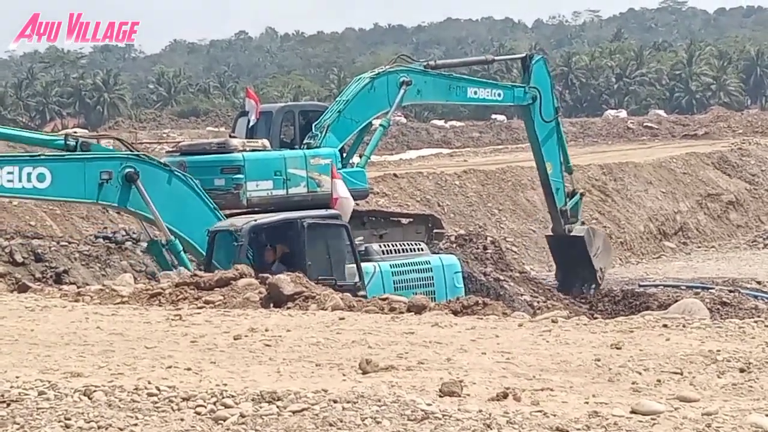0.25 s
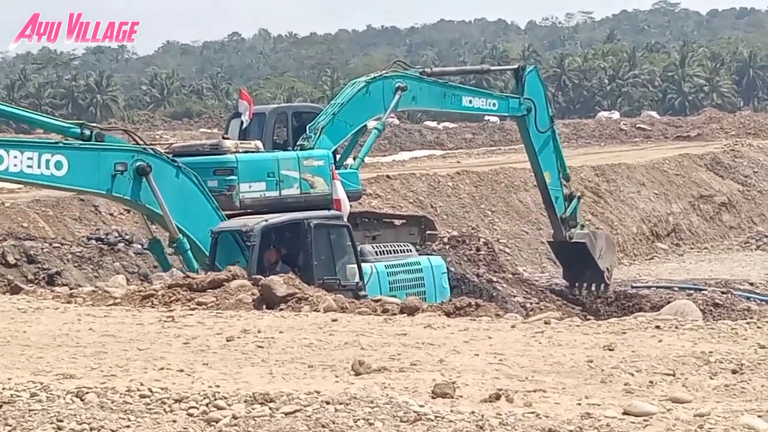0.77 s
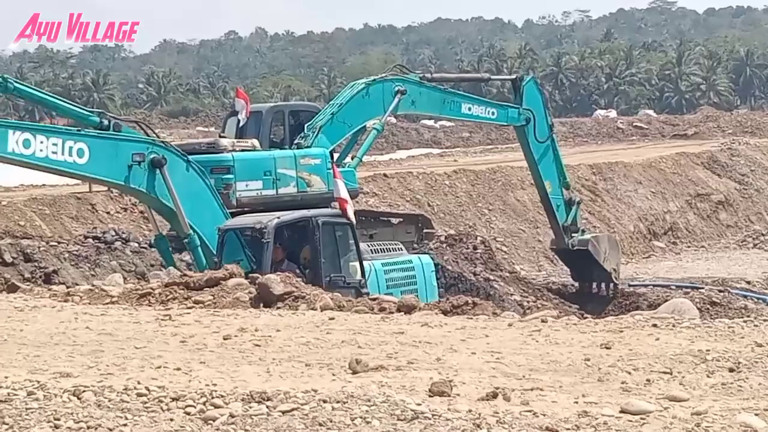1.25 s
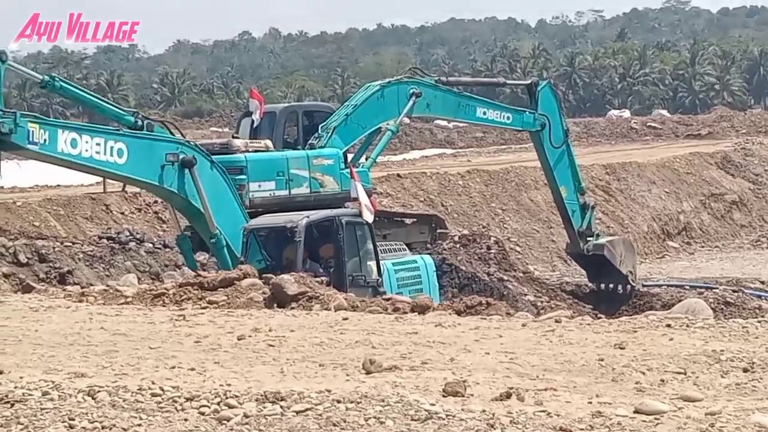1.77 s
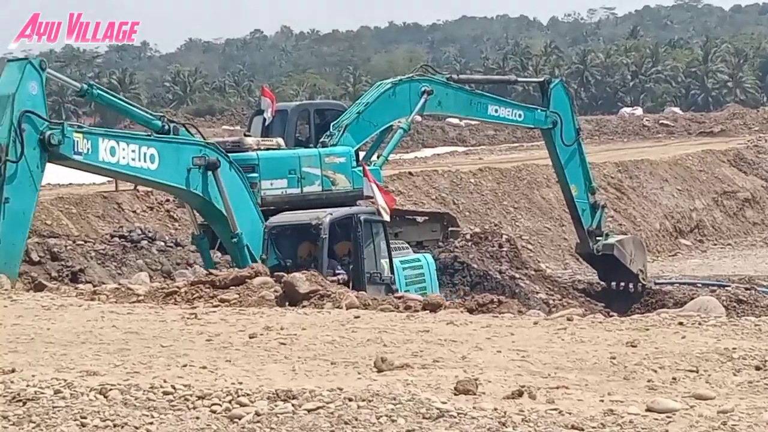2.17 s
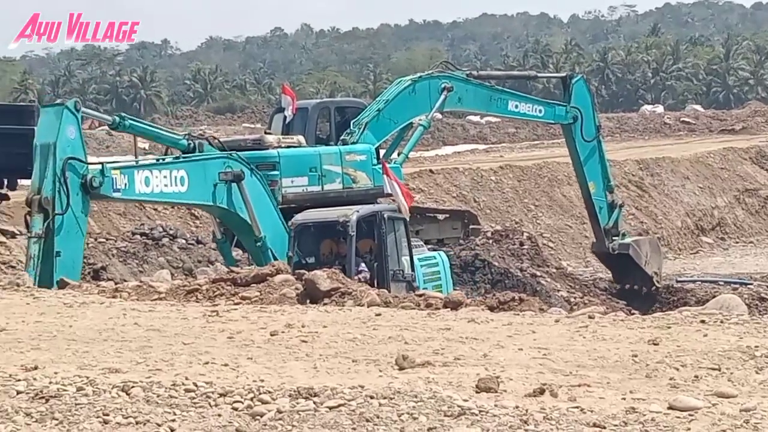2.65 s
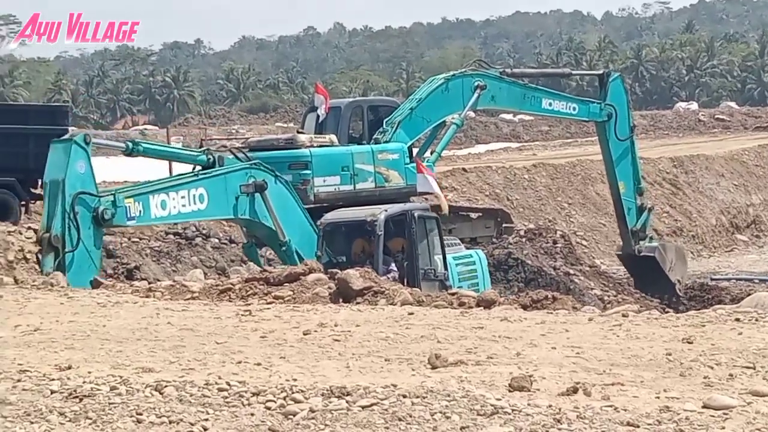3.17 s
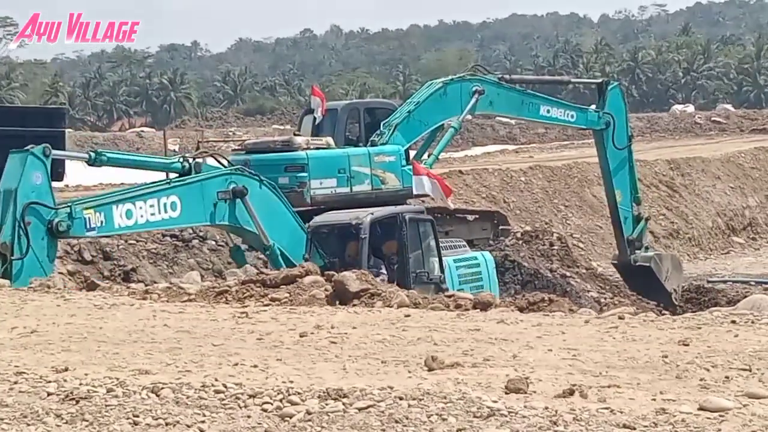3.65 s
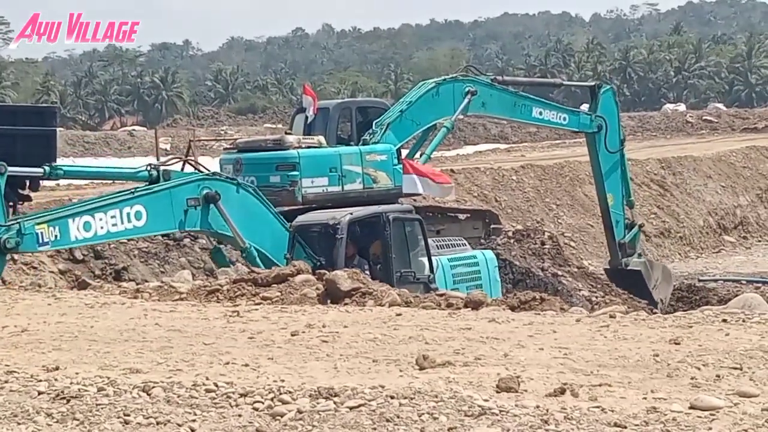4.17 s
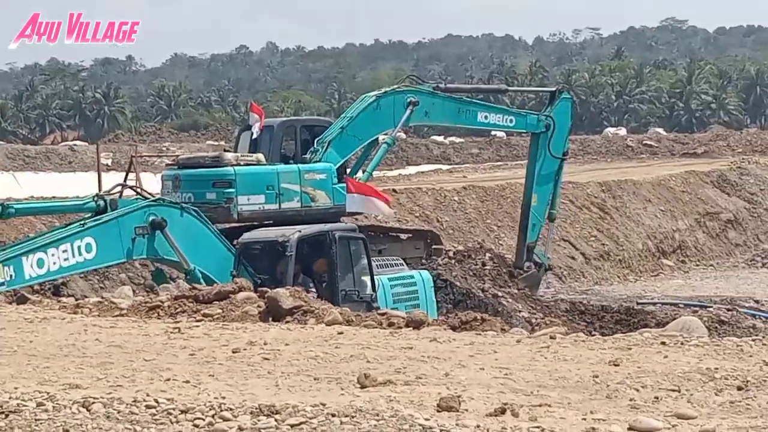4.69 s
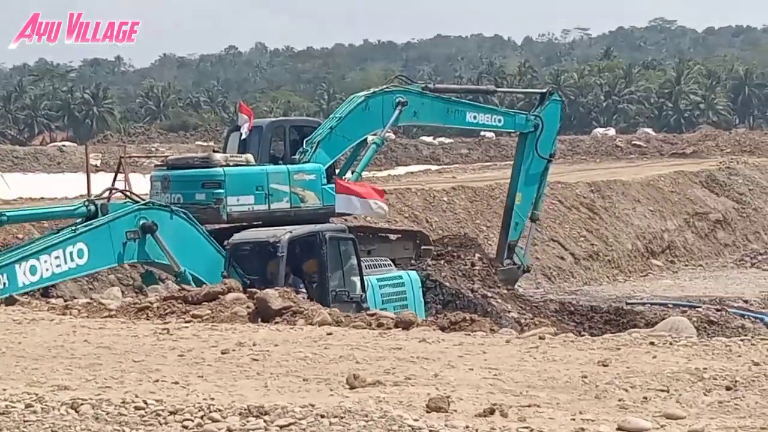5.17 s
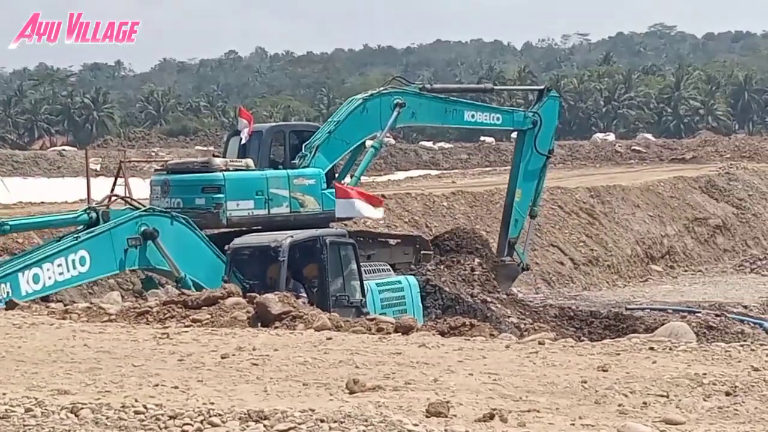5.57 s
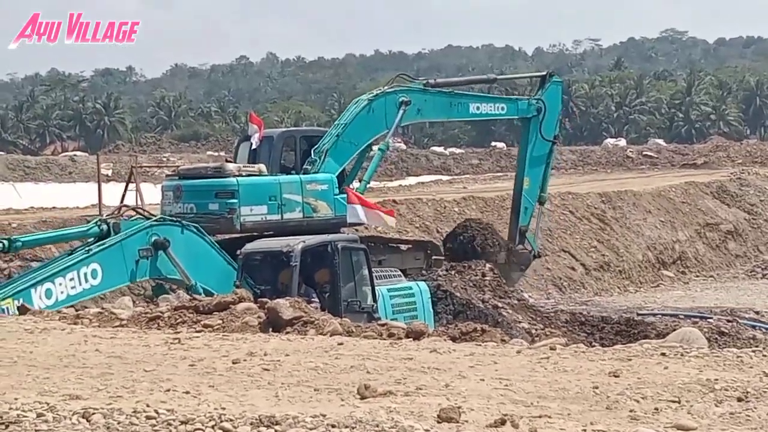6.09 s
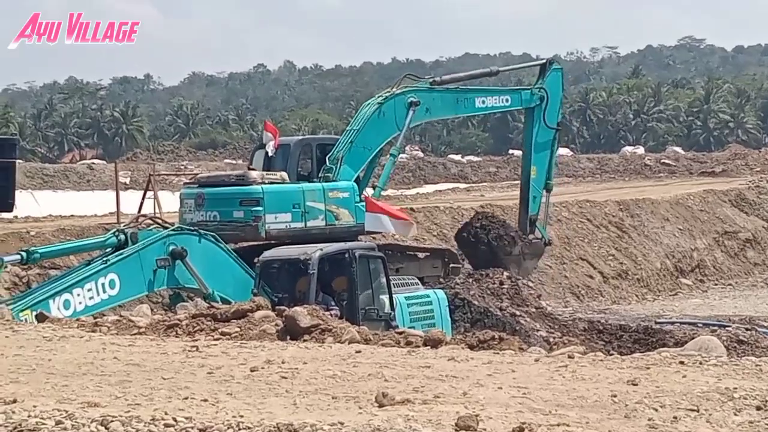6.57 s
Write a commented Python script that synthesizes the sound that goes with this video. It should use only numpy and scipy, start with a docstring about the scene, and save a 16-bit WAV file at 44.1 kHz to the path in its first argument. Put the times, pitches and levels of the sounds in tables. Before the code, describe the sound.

Two diesel excavators drone and clatter in an open pit, heard from some way off. Stones clack against a steel bucket, which then clanks, thuds and scrapes through rocky soil, its plates ringing with a dull echo from the earth bank. The sound breaks off for an instant and fades back in on calmer lifting, with hissing hydraulics, a few stone clacks and short scrapes.

```python
"""A steel excavator bucket clanks, thuds and scrapes through rocky soil in an open pit, some way off.
Its plates ring, stones clack and splinter on its teeth, and the earth bank answers with a dull echo.
Behind it run two diesel excavators: exhausts drone, engines clatter, turbos whistle, hydraulics hiss.
The sound breaks off during the digging and fades back in on calmer lifting work."""
import sys
import numpy as np
from scipy import signal
from scipy.fft import rfft, irfft, next_fast_len
from scipy.io import wavfile
from scipy.ndimage import uniform_filter1d, minimum_filter1d, map_coordinates

SR = 44100
rng = np.random.default_rng(int(sys.argv[2]) if len(sys.argv) > 2 else 0)


def inscribe(sig):
    """Save sig as 16-bit PCM at rate SR to the path in sys.argv[1].

    A 1-D sig is mono; a 2-D sig holds one channel per row.
    Samples are clipped to [-1, 1] before scaling.
    """
    pcm = np.round(np.clip(np.atleast_2d(sig).T, -1, 1) * 32767)
    wavfile.write(sys.argv[1], SR, pcm.astype(np.int16))


N = 301644
CUT_S = 4.371  # the sound breaks off: digging before, lifting after

# boom of the shaken arm: f/Hz, density/dB
ARM_SPECTRUM = [(50, -28), (95, -10.5), (120, 8), (165, 5), (210, 9), (270, 4.5), (345, -4), (480, -10),
                (850, -5.5), (1200, -7), (2200, -59)]


def amp(db):
    """Decibels to gain."""
    return 10 ** (np.asarray(db) / 20)


def unit(x):
    """Scale to rms 1."""
    return x / np.sqrt(np.mean(x ** 2) + 1e-20)


def after(s):
    """True after time s."""
    return np.arange(N) / SR > s


def curves(rows):
    """One value per sample for each column after the time."""
    s, *cols = np.transpose(rows)
    return [np.interp(np.arange(N) / SR, s, c) for c in cols]


def wobble(rate, size=N):
    """A smooth random curve, rate knots a second."""
    knots = rng.standard_normal(int(size * rate / SR) + 4)
    return map_coordinates(knots, [np.arange(size) * rate / SR])


def filtered(x, response):
    """Shape x with a frequency response."""
    m = next_fast_len(len(x) + 8192)
    return irfft(rfft(x, m) * response(np.fft.rfftfreq(m, 1 / SR)), m)[:len(x)]


def coloured(x, spectrum):
    """x through an EQ curve (f/Hz, level/dB), at rms 1."""
    f, db = np.transpose(spectrum)
    return unit(filtered(x, lambda hz: amp(np.interp(np.log(hz + 1), np.log(f), db, left=-100))))


def resonant(x, hz, width):
    """x through one steep-sided resonance, at rms 1."""
    w = width * np.sqrt(2)
    return unit(filtered(x, lambda f: (1j * f * w / (hz * hz - f * f + 1j * f * w)) ** 2))


def gritty(size, rate, depth_db):
    """Noise that comes in tiny random bursts."""
    return unit(rng.standard_normal(size) * amp(depth_db * wobble(rate, size)))


def fade(t, attack, t60):
    """A quick rise and an exponential decay."""
    return (1 - np.exp(-t / attack)) * amp(-60 * t / t60)


def tilted(hz, db, brightness):
    """Harder contact lifts the treble, by brightness dB per octave."""
    return db + brightness * np.log2(hz / 2400)


def rebounding(rows, delay, rebound_db):
    """Each contact (t/s, level/dB, ...), followed by its weaker rebound."""
    return [(s + k * delay, db + k * rebound_db, *rest) for s, db, *rest in rows for k in range(2)]


def add(track, s, sound):
    """Mix a sound into the track at time s."""
    room = track[round(s * SR):][:len(sound)]
    room += sound[:len(room)]


def bank(x):
    """The rough earth bank scatters back a dull, diffuse echo."""
    t = np.arange(SR // 2) / SR
    tail = coloured(rng.standard_normal(len(t)), [(60, 7), (3000, -3), (9000, -5)])
    tail *= fade(t, attack=0.045, t60=0.38)
    return signal.fftconvolve(x, tail / np.linalg.norm(tail))[:N]


def turbos():
    """Two thin, fuzzy whistles glide and swell with the speed of their turbines."""
    # whistle of the near and the far turbine: t/s, f/Hz
    near_glide = [(0, 12100), (.9, 11220), (1.45, 11240), (2, 9970), (4.37, 9700), (4.42, 11600),
                  (5.35, 11150), (6.84, 11750)]
    far_glide = [(1.7, 15900), (2.3, 14900), (3.4, 15900), (5.7, 13950), (6.84, 14550)]
    out = np.zeros(N)
    for glide, db, fuzz_hz in [(near_glide, -78, 420), (far_glide, -80, 600)]:
        hz, = curves(glide)
        level_db = db + 24 * np.log2(hz / hz.mean()) + 4.3 * wobble(6)  # faster is louder
        phase = 2 * np.pi * np.cumsum(hz * (1 + .004 * wobble(4))) / SR
        out += amp(level_db) * unit(wobble(fuzz_hz) * np.sin(phase))
    return out


def hydraulics(digging_db=-75):
    """Oil hisses in the lines, low while digging, surging while lifting; valves squeal as they open."""
    # oil flow while lifting: t/s, level/dB
    lift_flow = [(4.7, -63), (4.79, -64), (5.68, -70.5), (6.1, -72.5), (6.57, -62), (6.8, -73)]
    # oil hiss: f/Hz, density/dB
    hiss_spectrum = [(4000, -18), (6000, 2.5), (7500, 2), (9500, 3.5), (11000, -15), (13300, 1),
                     (15500, -18)]
    # oil forced past a spool: t/s, length/s, f/Hz, width/Hz, level/dB
    squeals = [(.38, .26, 4900, 200, -58), (4.251, .75, 4420, 600, -53.5), (4.25, .75, 5650, 900, -62),
               (5.08, .42, 5150, 280, -60.5)]
    lift_db, = curves(lift_flow)
    hiss_db = np.where(after(CUT_S), lift_db - 1.5, digging_db) + .8 * wobble(4)
    oil = amp(hiss_db) * coloured(rng.standard_normal(N), hiss_spectrum)
    for s, length, hz, width, db in squeals:
        size = int(length * SR)
        add(oil, s, amp(db) * np.hanning(size) * resonant(rng.standard_normal(size), hz, width))
    return oil


def exhaust(firing_hz, unsteady_db):
    """The tones of one exhaust pipe, each wavering in strength."""
    # pipe tones: multiple of the firing rate, level/dB
    orders = [(1, -45), (2, -47.5), (3, -36), (4, -76), (4.5, -50.5), (6, -57)]
    phase = 2 * np.pi * np.cumsum(firing_hz * (1 + 0.0041 * wobble(9))) / SR
    return sum(amp(db + unsteady_db * wobble(16)) * np.sqrt(2)
               * np.sin(k * phase + rng.uniform(0, 2 * np.pi)) for k, db in orders)


def engines():
    """Two exhausts beat against each other; load swells their lumpy rumble and the combustion clatter."""
    # engine load while digging and while lifting: t/s, level/dB
    dig_load = [(0.0, -41), (0.91, -41.5), (1.58, -35.5), (1.76, -40.5), (2.75, -41), (3.03, -34),
                (3.94, -40.5), (4.15, -35.5)]
    lift_load = [(4.75, -38.5), (5.78, -40), (6.34, -37), (6.8, -39.5)]
    # exhaust rumble and combustion clatter: f/Hz, density/dB
    rumble_spectrum = [(15, -76), (25, -44), (36, -29), (48, -17.5), (70, -18), (87, -14), (132, -1.5),
                       (188, -1), (206, 3), (222, -14.5), (286, -8), (338, -21), (393, -22.5), (520, -21.5),
                       (680, -33.5), (1140, -120)]
    clatter_spectrum = [(250, -30), (380, -13), (600, -3), (1050, -5.5), (1500, -5), (2100, -1),
                        (2600, 1.5), (3050, -2.5), (3400, -6.5), (4300, -14), (5200, -23), (6200, -43),
                        (8000, -41)]
    load_db, = curves(np.vstack([dig_load, lift_load]))
    firing_hz = 64.75 * (1 + 0.00878 * wobble(2.5))  # the governed speed hunts a little
    near = amp(-1.5) * exhaust(firing_hz, unsteady_db=-0.5)
    far = amp(-10) * exhaust(firing_hz * 0.98, unsteady_db=3.5)
    rumble_db = -31 + 0.46 * (load_db - load_db.mean())
    rumble = amp(rumble_db) * coloured(gritty(N, rate=24, depth_db=2.5), rumble_spectrum)
    clatter = amp(load_db - 1.6 + 1.8 * wobble(8)) * coloured(rng.standard_normal(N), clatter_spectrum)
    return near + far + rumble + clatter


def covers():
    """Engine covers and pumps ring in narrow bands of noise."""
    # their resonances: f/Hz, width/Hz, digging level/dB, lifting level/dB
    panels = [(871, 53, -51.5, -57), (1272, 160, -47, -49), (1684, 62, -49.5, -44.5),
              (1918, 81, -48.5, -75), (2356, 116, -43.5, -50.5), (2742, 72, -48.5, -47.5),
              (2934, 72, -48, -61), (3755, 110, -58, -68), (4343, 56, -61, -64.5), (4820, 100, -68, -87),
              (5970, 620, -72, -70), (8820, 480, -87, -68.5)]
    ring = sum(amp(np.where(after(CUT_S), lift_db, dig_db)) * resonant(rng.standard_normal(N), hz, width)
               for hz, width, dig_db, lift_db in panels)
    return amp(-2.5 + wobble(5)) * ring


def scrapes():
    """Gravel grinds along the teeth in swelling strokes."""
    # drags of the teeth: t/s, length/s, level/dB, brightness/(dB/octave)
    strokes = [(1.278, 0.46, -42, -5.5), (2.295, 0.13, -36, 1), (2.88, 0.26, -30.5, 0.5),
               (3.622, 0.35, -42.5, 2), (4.21, 0.044, -22.5, -2.5), (4.244, 0.17, -31, 1),
               (6.351, 0.18, -31.5, -1), (6.652, 0.065, -28, 5)]
    # grinding gravel: f/Hz, density/dB
    gravel = [(150, -6), (400, 4), (900, 0), (1600, 0.5), (2700, 0), (3600, -10), (5000, -27.5),
              (9000, -52.5)]
    out = np.zeros(N)
    for s, length, db, brightness in strokes:
        size = int(length * SR)
        spectrum = [(f, tilted(f, level, brightness)) for f, level in gravel]
        swell = np.sqrt(np.abs(np.hanning(size)))
        add(out, s, amp(db) * swell * coloured(gritty(size, rate=160, depth_db=2), spectrum))
    return out


def chatter(size, modes):
    """Rough contact noise through the resonances of a stone, a little different for each one."""
    return sum(amp(db) * resonant(rng.standard_normal(size), hz * (1 + .019 * rng.standard_normal()), width)
               for hz, width, db in modes)


def tooth(t):
    """The short ring of a steel tooth, a little different for each contact."""
    # tooth modes: f/Hz, level/dB, t60/s
    modes = [(1069, -7.5, 0.2), (1920, -2.5, 0.15), (2200, 0, 0.097), (2355, -1, 0.11), (2980, -2.5, 0.08),
             (3800, -9, .05)]
    ring = np.zeros(len(t))
    for hz, db, t60 in modes:
        strength = amp(db + 3 * rng.standard_normal())
        detuned_hz = hz * (1 + .012 * rng.standard_normal())
        ring += strength * np.sin(2 * np.pi * (detuned_hz * t + rng.random())) * fade(t, .002, t60)
    return ring


def stones(note_cycles=96):
    """A clack is a burst of chipping with short notes of stone and tooth; splinters ring far higher."""
    # stone hits: t/s, level/dB, note f/Hz, note offset/dB
    clacks = [(.293, -21, 3060, -0.5), (.393, -33.5, 2965, 18), (.921, -21, 1876, -1), (1.308, -50, 897, 9),
              (1.416, -40, 1265, 2.5), (1.519, -23, 1880, -4), (1.664, -38, 1510, -3.5),
              (2.258, -49.5, 1890, 14.5), (2.843, -36.5, 3500, 4.5), (4.919, -27.5, 2880, -3),
              (5.678, -33.5, 2760, -5), (6.182, -30.5, 2550, -11), (6.362, -41.5, 1723, 9.5),
              (6.404, -38, 1730, 6), (6.661, -32, 3300, -10), (6.703, -28.5, 2030, -16)]
    # rock splitting under the teeth: t/s, level/dB
    splinters = [(2.992, -47), (3.028, -52), (3.049, -54.5), (3.494, -58), (4.19, -57), (4.341, -46.5)]
    # resonances of stones and of splinters: f/Hz, width/Hz, level/dB
    stone_modes = [(294, 65, -5), (813, 160, -10), (1115, 64, -4.5), (1905, 470, -4), (2390, 240, -5),
                   (2900, 220, -1.5), (3640, 950, -9), (5560, 1800, -29), (8600, 3000, -37)]
    shard_modes = [(5530, 850, 1), (7050, 840, -6.5), (8160, 350, -2.5), (9360, 460, -6), (10200, 300, -3),
                   (12600, 1800, -9)]
    out, t = np.zeros(N), np.arange(SR // 4) / SR
    for s, db, hz, note_db in rebounding(clacks, delay=.009, rebound_db=-8.5):  # lands on a second edge
        chips = chatter(len(t), stone_modes) * fade(t, attack=0.0027, t60=0.12)
        note = np.sin(2 * np.pi * (hz * t + rng.random())) * fade(t, attack=0.0011, t60=note_cycles / hz)
        add(out, s, amp(db) * (amp(1) * chips + amp(note_db + 9) * note + amp(-5.5) * tooth(t)))
    clack_splinters = [(s, db - 25) for s, db, _, _ in clacks]
    for s, db in splinters + clack_splinters:
        add(out, s, amp(db) * chatter(len(t), shard_modes) * fade(t, attack=.0005, t60=.075))
    return out


def jolts():
    """Heavy jolts shake the whole arm with a low boom."""
    # arm jolts: t/s, level/dB, pitch ratio
    hits = [(2.014, -28, 0.93), (2.965, -14.5, 0.92), (3.52, -21, 1.1), (4.222, -18, 1.2)]
    out, t = np.zeros(N), np.arange(SR * 3 // 5) / SR
    for s, db, pitch in hits:
        body = coloured(rng.standard_normal(len(t)), [(f * pitch, level) for f, level in ARM_SPECTRUM])
        add(out, s, amp(db) * body * fade(t, attack=0.0042, t60=0.44))
    return out


def plates(t, brightness, soil_damping=0.86):
    """The bucket's steel plates ring at new strengths on each blow; soil shortens their decay."""
    # plate modes: f/Hz, level/dB, t60 without soil/s
    modes = [(338, -27, .5), (385.3, -15, 0.6), (628, -13.5, 0.36), (855, -11, 0.44), (1020, -34, .3),
             (1316.4, -3, 0.28), (1356, -2, 0.22), (1617, -11.5, 0.33), (1748, -9, 0.32), (2060, -12, 0.63),
             (2192, -10, .35), (2373, 3, 0.3), (2473, -17.5, 0.27), (2670, -12.5, 0.3), (2680, -6, 0.59),
             (2930, 3, .2), (2875, -5, 0.25), (2980, -3, 0.33), (3180, -5, 0.41), (3250, 2.5, 0.089),
             (3520, -20, 0.27), (3860, -16.5, 0.28), (4130, -17.5, 0.3)]
    hz, db, t60 = np.transpose(modes)[:, :, None]
    strength = amp(tilted(hz, db, brightness) + 2.5 * rng.standard_normal(hz.shape))
    loaded_hz = hz * (1 + 0.0024 * rng.standard_normal(hz.shape))  # the shifting load detunes the plates
    partials = strength * np.sin(2 * np.pi * (loaded_hz * t + rng.random(hz.shape)))
    return (partials * fade(t, 0.00096, t60 * soil_damping)).sum(0) / np.linalg.norm(strength)


def bucket():
    """Each blow rings the plates, crunches rock against steel and thuds through the arm."""
    # bucket hits: t/s, level/dB, brightness/(dB/octave)
    blows = [(1.330, -26, -3.5), (1.9964, -14.5, -1.5), (2.9696, -13.5, -7), (2.9901, -6, -0.5),
             (3.0314, -17.5, -3.5), (3.0659, -14.5, 2), (3.1762, -14.5, -2.5), (3.490, -3, 2.5),
             (3.6214, -19, 0.5), (4.1006, -24, -3.5), (4.1999, -17.5, -5), (4.2203, -19.5, -7.5),
             (4.3001, -22, 6), (4.3495, -15, 1)]
    # crushing contact of rock and steel: f/Hz, density/dB
    crunch_spectrum = [(150, -22.5), (350, -17.5), (700, -19.5), (1300, -2.5), (1650, -8.5), (2050, -3.5),
                       (2400, 4.5), (3000, -4.5), (3600, -9), (4200, -20), (4800, -33.5), (6500, -55),
                       (10000, -52), (15000, -72)]
    out, t = np.zeros(N), np.arange(SR * 3 // 5) / SR
    first_bite = amp(-6) * fade(t, attack=.0004, t60=0.023)
    crunch_envelope = first_bite + fade(t, attack=0.00039, t60=0.27)
    for s, db, brightness in rebounding(blows, delay=.014, rebound_db=-3.5):  # the teeth strike twice
        ring = plates(t, brightness)
        contact = [(f, tilted(f, level, brightness)) for f, level in crunch_spectrum]
        crunch = coloured(gritty(len(t), rate=298, depth_db=3), contact) * crunch_envelope
        thud = coloured(rng.standard_normal(len(t)), ARM_SPECTRUM) * fade(t, attack=0.0037, t60=0.37)
        thud_db = -19 - 0.97 * brightness  # dull blows thud more
        add(out, s, amp(db) * (amp(-6) * ring + amp(-8.5) * crunch + amp(thud_db) * thud))
    return out


def scene():
    """The digging and its echo over the running machines; the stones are a touch drier."""
    machines = engines() + covers() + hydraulics() + turbos()
    digging = bucket() + jolts() + scrapes()
    clacks = stones()
    echo = bank(amp(-15.5) * digging + amp(-16) * clacks)
    return (digging + clacks + echo + machines)[None]


def limited(x, ceiling=.85, reaction_s=.002):
    """The gain ducks briefly wherever a peak would pass the ceiling."""
    size = int(reaction_s * SR)
    needed = ceiling / np.maximum(np.abs(x), ceiling)
    return x * uniform_filter1d(minimum_filter1d(needed, 2 * size), size)


def record(dry, resume_s=4.42, fade_s=0.23, top_hz=15550):
    """Peaks are limited, the sound breaks off and fades back in a little lower; a high cut follows."""
    rise = np.clip((np.arange(N) / SR - resume_s) / fade_s, 0, 1)
    gain = np.where(after(CUT_S), amp(-46) + amp(-1.5) * rise, 1)
    return filtered(limited(dry[0]) * gain, lambda hz: hz < top_hz)[None]


dry = scene()
out = record(dry)
inscribe(out)
```